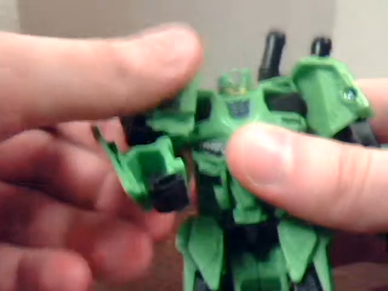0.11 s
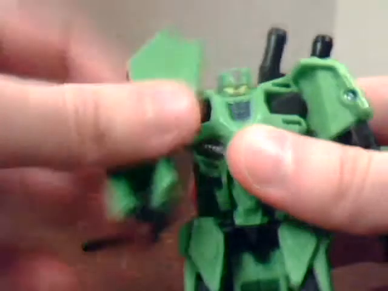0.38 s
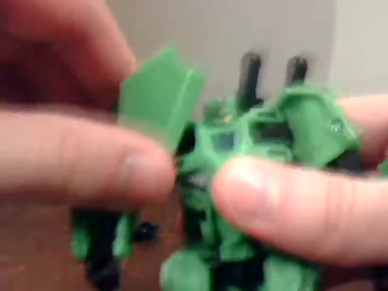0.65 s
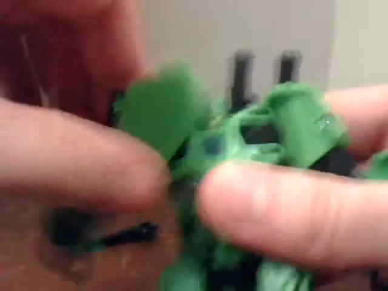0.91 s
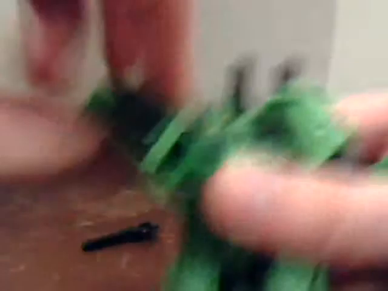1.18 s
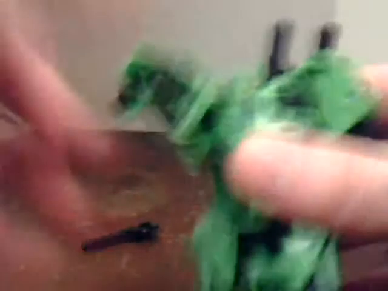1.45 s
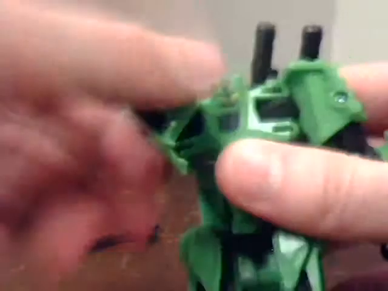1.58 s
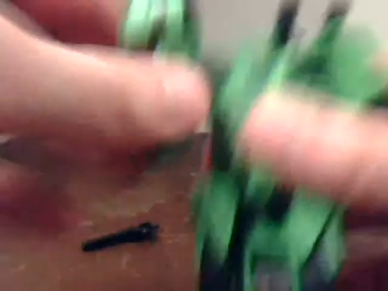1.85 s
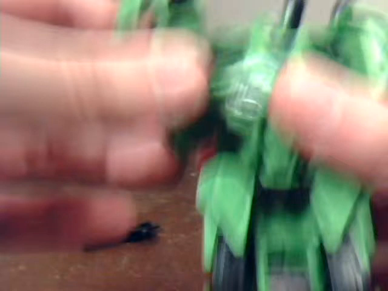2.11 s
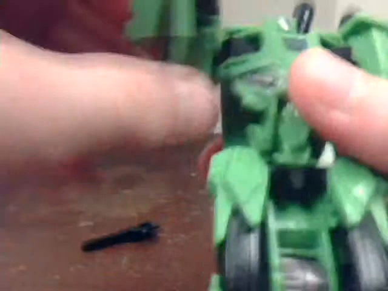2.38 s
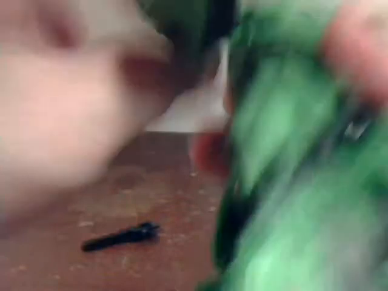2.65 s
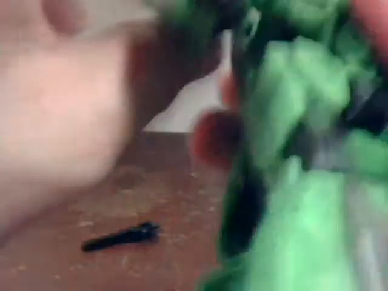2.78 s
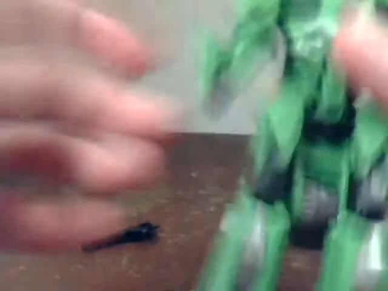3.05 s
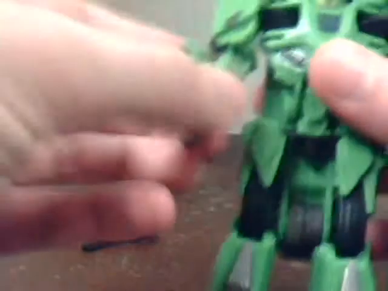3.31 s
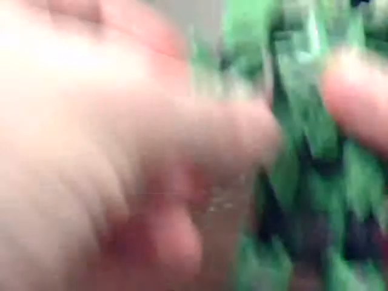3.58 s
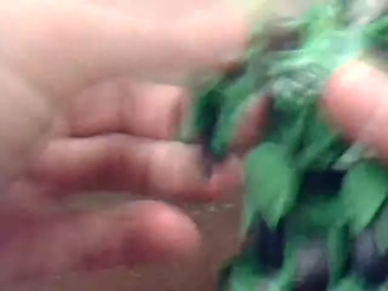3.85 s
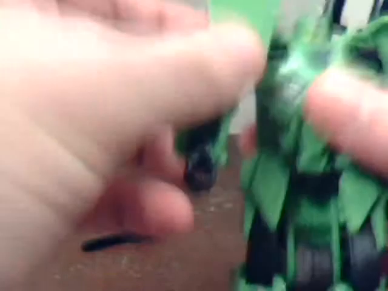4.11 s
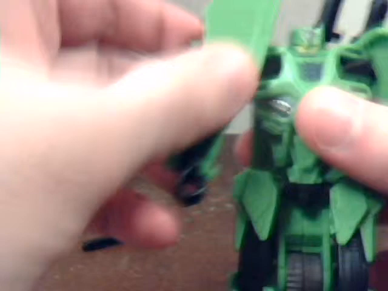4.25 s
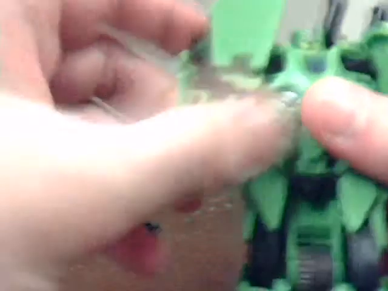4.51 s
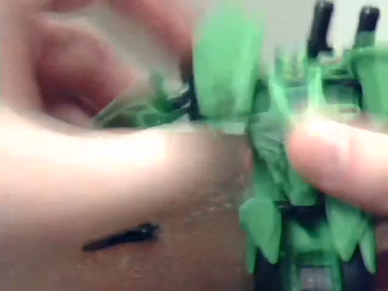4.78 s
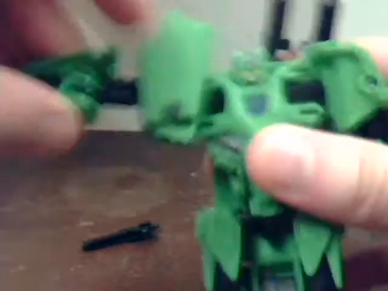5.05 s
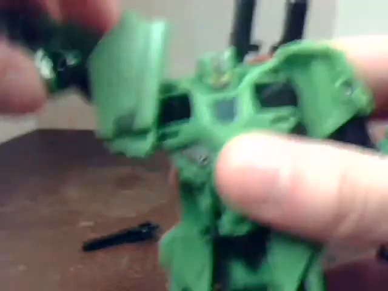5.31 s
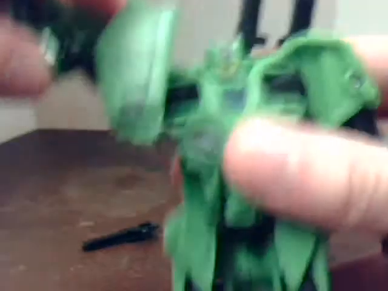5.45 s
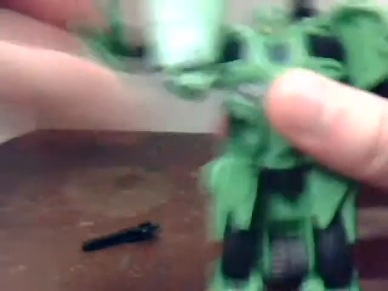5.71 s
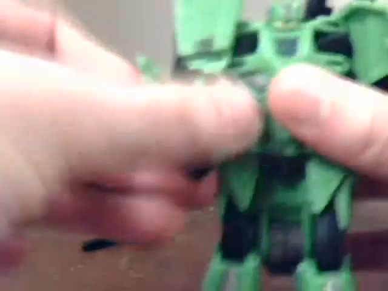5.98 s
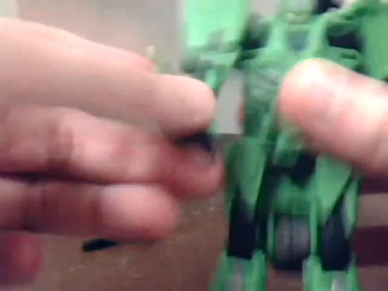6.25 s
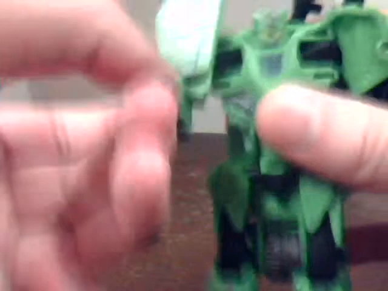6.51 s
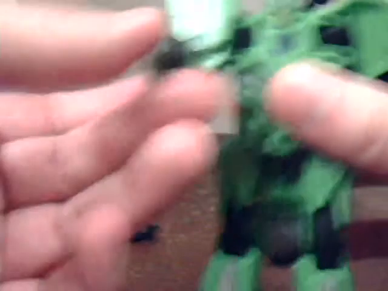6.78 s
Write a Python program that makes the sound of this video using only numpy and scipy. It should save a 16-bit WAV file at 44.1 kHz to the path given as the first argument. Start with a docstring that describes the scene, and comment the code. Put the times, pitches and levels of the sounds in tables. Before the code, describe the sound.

Small plastic joints of a toy figure click and snap under moving fingers, with soft desk bumps, over a low steady fan hum.

```python
"""A quiet room, a desk, and a microphone close to a small plastic figure whose joints are turned by hand.
Joints click: a snap and a short rattle of noise ring the plastic modes. Fingers rub it: grainy band noise.
Bumps reach the desk: decaying sines with a noisy clatter and crack. Slides on the desk are noise through
its modes and a faint squeal. A fan hums under it all: shaped noise and wavering tones.
Near echoes and a short tail place the figure and desk in the room."""
import sys
import numpy as np
from scipy import signal
from scipy.fft import rfft, irfft
from scipy.io import wavfile
from scipy.ndimage import uniform_filter1d

SR = 44100
rng = np.random.default_rng(int(sys.argv[2]) if len(sys.argv) > 2 else 0)


def transcribe(signal):
    """Save signal, clipped to [-1, 1], as a 16-bit WAV file at the path in sys.argv[1]."""
    frames = np.atleast_2d(signal).T
    limited = np.clip(frames, -1, 1)
    pcm = np.round(limited * 32767).astype(np.int16)
    wavfile.write(sys.argv[1], SR, pcm)


N = 304819

# modes of the desk in five groups: board, hollow, low modes, frame, thud;
# each mode is (frequency [Hz], level within the group [dB], t60 before a bump's ring factor [s])
DESK_MODES = [
    [(1060, -9, 0.048), (1134, -2.5, 0.065), (1211, -4, 0.037), (1314, -7, 0.041), (1534, -22.5, 0.088),
     (1950, -23.5, 0.049), (2082, -20.5, .06), (2466, -20, .05), (2520, -20, 0.085), (2640, -18, .06),
     (3130, -20, 0.06), (3720, -23, 0.023)],
    [(933, 8, 0.082), (1050, -19.5, .08)],
    [(344, 3.5, 0.074), (432, -9.5, 0.26), (461, 7.5, 0.045)],
    [(546.5, 5, 0.051), (640, -9, 0.031)],
    [(93.8, -4, 0.22), (150, 11, 0.099), (186.8, -14, .08), (265, 2, 0.124)],
]
# modes close to the struck pitch gain this much [dB]; spread as a share of the pitch
FAVOUR_DB, FAVOUR_SPREAD = 10.5, 0.085


def gain_of(db):
    """Decibels to a factor."""
    return 10 ** (np.asarray(db) / 20)


def evened(x):
    """Scales to rms 1."""
    return x / np.sqrt(np.mean(x ** 2) + 1e-20)


def peaked(x, size=130):
    """Scales so that the loudest stretch of the given size in samples (130 is 3 ms) has rms 1."""
    return x / np.sqrt(uniform_filter1d(x ** 2, size).max())


def smoothed(x, size):
    """Two running means in a row: a slow, soft wander when x is noise."""
    return uniform_filter1d(uniform_filter1d(x, size), size)


def add(mix, s, sound):
    """Mixes a sound in at a time in seconds."""
    part = mix[round(s * SR):][:len(sound)]
    part += sound[:len(part)]


def resonate(x, hz, width):
    """Shifts hz down to zero, smooths, and shifts back: a resonance of gain 1."""
    turn = np.exp(2j * np.pi * np.cumsum(hz * np.ones(len(x))) / SR)
    r = np.exp(-np.pi * width / SR)
    return 2 * (turn * signal.lfilter([1 - r], [1, -r], x / turn)).real


def favour_db(f, struck_hz):
    """Extra level of a mode that lies close to the struck pitch."""
    return FAVOUR_DB * np.exp(-(np.log(f / struck_hz) / FAVOUR_SPREAD) ** 2)


def stroke(peak, swell, fade):
    """Start time and envelope of a stroke: an even swell and fade in decibels, with tapered ends."""
    far_db = -24  # level at both ends, under the peak
    t = np.arange(-swell, fade, 1 / SR)
    level_db = np.interp(t, [-swell, 0, fade], [far_db, 0, far_db])
    return peak - swell, signal.windows.tukey(len(t), .12) * gain_of(level_db)


def fan():
    """Steady noise with a few humps, and hum tones that waver a little in level and phase."""
    # fan and hiss spectrum: (frequency [Hz], relative level [dB])
    air_curve = [(12, -30), (20, -12.5), (22, -7.5), (37, -12), (60, -4.5), (127, -5), (198, -10),
                 (262, -10.5), (301, -13), (357, -13.5), (422, -19), (976, -22), (1480, -32),
                 (16000, -48.5)]
    # humps of the fan noise: (frequency [Hz], width [Hz], level over the air [dB])
    humps = [(32.7, 14, 9), (88, 24.4, 3), (127, 22, 6.5), (170, 8.9, 6.5), (256.4, 14, 6.5),
             (672, 324, 5.5), (986, 30, 6.5)]
    # mains hum and a thin whine: (frequency [Hz], rms level before the waver [dB])
    tones = [(120, -57), (360.3, -60.5), (15305, -94)]
    hz, t = np.fft.rfftfreq(N, 1 / SR), np.arange(N) / SR
    curve_hz, curve_db = np.transpose(air_curve)
    shape_db = np.interp(np.log(hz + 1), np.log(curve_hz + 1), curve_db)
    for at, width, up_db in humps:
        shape_db = shape_db + up_db / (1 + (2 * (hz - at) / width) ** 2)
    air = evened(irfft(rfft(rng.standard_normal(N)) * gain_of(shape_db), N))
    out = gain_of(-44.5) * air
    # the wavers share one scaling to rms 1
    wavers = evened(np.array([smoothed(rng.standard_normal(N), 4000) for _ in tones]))
    for (f, db), waver in zip(tones, wavers):
        level = gain_of(db + 0.34 * waver) * np.sqrt(2)
        out = out + level * np.sin(2 * np.pi * f * t + 0.2 * waver)
    return out


def click(panels_db, shell_db, edges_db, t60, struck_hz):
    """A snap and its brief rattle ring each part of the figure by its own amount."""
    # modes of the figure in four groups: panels, shell, edges, tips;
    # each mode is (frequency [Hz], width [Hz], level within the group [dB])
    plastic_modes = [
        [(3850, 234, 5), (4200, 230, 14.5), (4325, 1100, 11), (4520, 234, 11.5), (5030, 320, 6.5),
         (5530, 680, 9), (6300, 300, 3.5)],
        [(1656, 400, 1), (2150, 260, -3), (2415, 140, 0), (2496, 820, -0.5), (2724, 196, -3.5),
         (3220, 200, -2.5)],
        [(7020, 243, -3), (7580, 690, -2.5), (8300, 880, -6), (9210, 449, -4), (10020, 450, -7.5),
         (10800, 700, -9.5)],
        [(11770, 350, -0.5), (12960, 1400, -2.5), (14500, 1000, -2)],
    ]
    # the tips ring with the edges but weaker; long rattles shake them more (251.5 dB per s of t60)
    tips_db = edges_db - 12 + 251.5 * t60
    noise = rng.standard_normal(2500)
    t = np.arange(len(noise)) / SR
    onset = 1 - np.exp(-t / (0.13 * t60))  # long rattles start softer
    rattle = noise * gain_of(-60 * t / max(t60, .002)) * onset
    snap = gain_of(11.0) * (t == 0)
    drive = rattle + snap
    out = np.zeros(len(t))
    for part_db, modes in zip([panels_db, shell_db, edges_db, tips_db], plastic_modes):
        part = np.zeros(len(t))
        for k, (f, width, db) in enumerate(modes):
            ring = resonate(resonate(drive, f, width), f, 3 * width) / np.sqrt(width)
            part += (-1) ** k * ring * gain_of(db + favour_db(f, struck_hz))
        out += gain_of(part_db) * peaked(part)
    return out


def rub(peak, swell, fade, db, hz):
    """Skin on plastic: grainy hiss in one wide band."""
    s, window = stroke(peak, swell, fade)
    hiss, flutter = rng.standard_normal((2, len(window)))
    grains = hiss * gain_of(1.2 * evened(uniform_filter1d(flutter, 90)))
    band = resonate(resonate(grains, hz, 1.1 * hz), hz, 1.6 * hz)
    return s, window * gain_of(db) * evened(band)


def bump(board_db, hollow_db, low_db, thud_db, ring_factor, struck_hz):
    """A blow sets off the desk modes; where it lands decides the strength of each."""
    frame_db = low_db - 3  # the frame rings with the low modes
    groups_db = [board_db, hollow_db, low_db, frame_db, thud_db]
    noise = rng.standard_normal(SR // 3)
    t = np.arange(len(noise)) / SR
    rise = 0.0019 * ring_factor ** 3  # [s]: soft blows ring long and start slowly
    onset = 1 - np.exp(-t / max(rise, 1e-4))

    # many weak modes blur together
    clatter = resonate(resonate(noise, 600, 1600), 604, 2280) * gain_of(-60 * t / (.05 * ring_factor))
    clatter_db = np.mean([board_db, low_db, thud_db]) - 14
    out = gain_of(clatter_db) * peaked(clatter * onset, size=300)
    crack = resonate(resonate(noise[::-1], 2300, 2500), 2250, 3600) * gain_of(-60 * t / (.04 * ring_factor))
    out = out + gain_of(board_db - 16.5) * peaked(crack * onset, size=300)

    roughness = gain_of(1.7 * evened(smoothed(noise, 150)))  # slow random level wander roughens the rings
    for group_db, modes in zip(groups_db, DESK_MODES):
        ring = np.zeros(len(t))
        for f, db, t60 in modes:
            chance_db = 1.1 * rng.standard_normal()
            decay_db = -60 * t / (t60 * ring_factor)
            ring += gain_of(db + favour_db(f, struck_hz) + chance_db + decay_db) * np.sin(2 * np.pi * f * t)
        out = out + gain_of(group_db) * peaked(ring * onset * roughness, size=300)
    return out


def rubbed_modes(noise, modes):
    """Desk modes kept sounding by noise, at rms 1."""
    out = np.zeros(len(noise))
    for f, db, t60 in modes:
        out += gain_of(db) * resonate(resonate(noise, f, 2.0 / t60), f, 280) * np.sqrt(t60)
    return evened(out)


def slide(peak, swell, fade, board_db, hollow_db, squeal_db):
    """Friction keeps the desk modes sounding and adds a faint squeal, uneven from stick and slip."""
    # resonances of the squeal: (frequency [Hz], width [Hz], relative level [dB])
    squeal_modes = [(2150, 220, -4.5), (2360, 90, -4), (2700, 270, -11), (4200, 450, -0.5), (4900, 400, -2),
                    (5820, 180, -1.5), (6320, 170, -6), (11300, 500, -8.5)]
    s, window = stroke(peak, swell, fade)
    scrape, friction, wander = rng.standard_normal((3, len(window)))
    grip = gain_of(3.4 * evened(uniform_filter1d(wander, 300)))  # stick and slip
    board = rubbed_modes(scrape, DESK_MODES[0])
    hollow = rubbed_modes(scrape, DESK_MODES[1] + DESK_MODES[2][1:2])  # with one long low mode
    squeal = np.zeros(len(window))
    for f, width, db in squeal_modes:
        squeal += gain_of(db) * resonate(resonate(friction * grip, f, width), f, 2 * width) / np.sqrt(width)
    out = gain_of(board_db) * board + gain_of(hollow_db) * hollow + gain_of(squeal_db) * evened(squeal)
    return s, window * out


def room(x):
    """Single near echoes, a dense early tail, then a fainter, duller, longer tail on the same taps."""
    # echoes off desk and hands: (delay [s], level [dB])
    echoes = [(.0029, -12), (.0044, -24), (.0057, -24.5), (.0083, -30)]
    t = np.arange(SR // 4) / SR
    taps = rng.choice([-1., 1.], len(t)) * (rng.random(len(t)) < .4) * (t > .005)
    near = evened(signal.lfilter([1], [1, -.3], taps * gain_of(-60 * t / 0.086)))
    far = evened(signal.lfilter([1], [1, -.5], taps * gain_of(-60 * t / .18)))
    response = (gain_of(-20.5) * near + gain_of(-36) * far) / np.sqrt(len(t))
    for k, (s, db) in enumerate(echoes):
        response[round(s * SR)] += (-1) ** k * gain_of(db)  # every other echo is flipped
    return signal.oaconvolve(x, response)[:N]


def scene():
    """Toy, hands and desk in their room, over the fan."""
    # joint clicks: (time [s], panels [dB], thick shell [dB], thin edges [dB],
    # t60 of the rattle [s], struck pitch [Hz])
    clicks = [(0.2796, -61, -65, -65, 0.021, 4560), (0.8257, -44.5, -47.5, -55.5, 0.017, 5020),
              (0.8848, -61, -56, -69, 0.04, 2350), (1.3332, -46.5, -53, -46, 0.03, 4440),
              (1.5488, -50, -46, -65, 0.015, 2150), (1.6272, -57.5, -60, -66, 0.026, 2150),
              (1.6979, -54, -49, -66, 0.025, 2150), (1.7115, -57, -58, -63, 0.018, 2150),
              (1.7612, -59, -57, -65, 0.028, 2150), (1.773, -55, -51.5, -53, 0.02, 2370),
              (2.28, -58.5, -59, -61, 0.026, 3280), (2.354, -50, -53.5, -58, 0.025, 3200),
              (2.7877, -63, -55.5, -78, 0.021, 2360), (2.9047, -60, -63, -62, 0.011, 5030),
              (3.0867, -54, -59, -67, 0.006, 2350), (3.678, -55.5, -67, -45, 0.0037, 9900),
              (3.738, -59, -41.5, -70, 0.0018, 3240), (3.7761, -62, -56, -78, 0.0051, 1730),
              (3.819, -58, -63, -65, 0.024, 4980), (3.9422, -62.5, -55.5, -70, 0.0093, 2300),
              (4.0496, -33, -45.5, -45.5, 0.0053, 4200), (4.1034, -38.5, -54, -53, 0.008, 4200),
              (4.1249, -11.5, -22, -21.5, 0.0035, 4450), (4.6868, -61, -56, -56, 0.01, 7400),
              (4.796, -41, -43.5, -50, 0.015, 4200), (4.8666, -32.5, -25.5, -62, 0.018, 2430),
              (4.932, -38, -45, -50, 0.011, 4580), (4.98, -63, -49, -75, 0.017, 2150),
              (5.008, -57, -57, -62, 0.016, 2150), (5.036, -59, -58, -66, 0.03, 4130),
              (5.3237, -48, -47.5, -58, 0.0027, 3850), (5.3614, -62, -57.5, -61, 0.028, 3800),
              (5.3727, -49, -60, -53.5, 0.011, 4200), (5.4921, -50, -48, -62, 0.0066, 3320),
              (5.646, -45.5, -52.5, -74, 0.011, 4600), (5.6614, -58, -62, -69, .006, 6300),
              (5.9743, -50.5, -48.5, -57, 0.011, 2300), (6.3684, -62, -55.5, -66.5, 0.014, 2700)]
    # fingers rubbing plastic: (peak time [s], swell [s], fade [s], level at the peak [dB], centre [Hz])
    rubs = [(0.33, 0.11, .12, -68, 8000), (2.351, 0.067, .01, -55.5, 4900), (2.595, 0.086, .015, -64, 4500),
            (2.636, 0.034, .045, -63, 4700), (4.512, .02, 0.038, -65, 5500), (4.792, .045, .004, -56, 3800)]
    # bumps into the desk: (time [s], board [dB], hollow ring [dB], low modes [dB], bass thud [dB],
    # ring factor on every t60 [-], struck pitch [Hz])
    bumps = [(0.824, -59, -45.5, -42.5, -64, 0.58, 580), (0.8863, -47, -35.5, -34, -57, 1.07, 432),
             (1.5491, -40.5, -38.5, -34.5, -33, 1.08, 200), (1.701, -46.5, -35, -45, -62, 1.78, 560),
             (1.761, -68, -64, -48, -33.5, 0.58, 265), (3.737, -42, -64, -62, -64, 0.41, 1300),
             (4.1247, -42.5, -43.5, -41.5, -47, 0.88, 1060), (4.7945, -60, -43, -49, -56, 0.45, 930),
             (4.8665, -21, -28.5, -29, -21, 1.19, 1300), (4.9786, -59, -35.5, -44, -29, 0.51, 1130),
             (5.0, -43.5, -46, -43.5, -26.5, 1.6, 148), (5.366, -67, -66, -49, -60, .6, 460),
             (5.975, -57, -55, -54, -52, 0.65, 640)]
    # sliding on the desk: (peak time [s], swell [s], fade [s], board [dB], hollow ring [dB], squeal [dB])
    slides = [(0.93, .03, 0.054, -68, -51.5, -75), (0.994, .06, 0.085, -63, -48, -60.5),
              (1.06, .07, 0.081, -73, -55, -64), (1.702, 0.039, 0.074, -54, -50, -59),
              (1.755, 0.023, 0.16, -58, -53, -62.5), (4.942, 0.0055, .035, -45, -43, -59),
              (4.987, .012, 0.028, -38, -41, -57), (5.015, .03, .035, -64, -50, -55),
              (5.042, .02, 0.059, -46, -48, -57.5)]
    toy, desk = np.zeros(N), np.zeros(N)
    for s, *settings in clicks:
        add(toy, s, click(*settings))
    for row in rubs:
        add(toy, *rub(*row))
    for s, *settings in bumps:
        add(desk, s, bump(*settings))
    for row in slides:
        add(desk, *slide(*row))
    echoed = room(toy + gain_of(-6.5) * desk)  # the desk sends less into the room
    return (toy + echoed + desk + fan())[None]


def record(dry):
    """The band limit at 15950 Hz, then a small constant converter offset."""
    band_limit = signal.firwin(401, 15950, window=("kaiser", 9), fs=SR)
    return signal.oaconvolve(dry, band_limit[None], "same") + .0077


dry = scene()
out = record(dry)
transcribe(out)
```